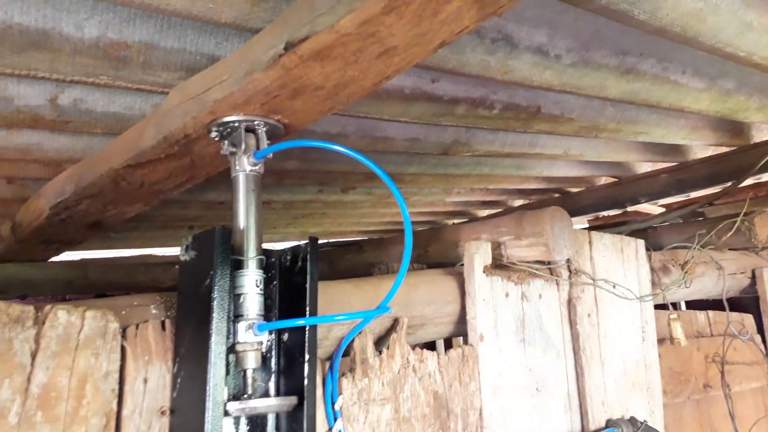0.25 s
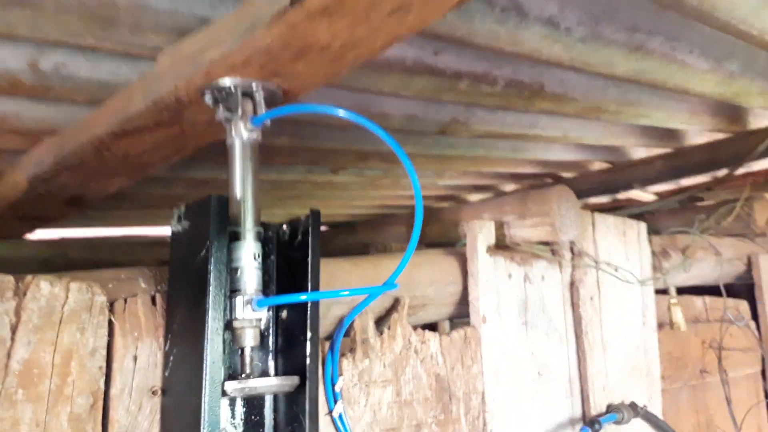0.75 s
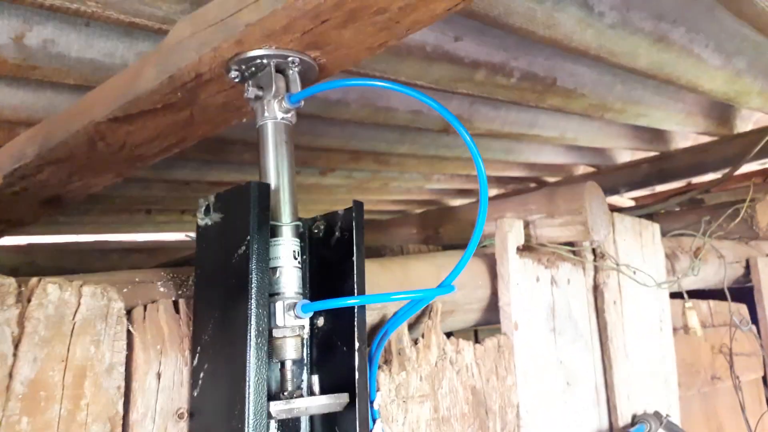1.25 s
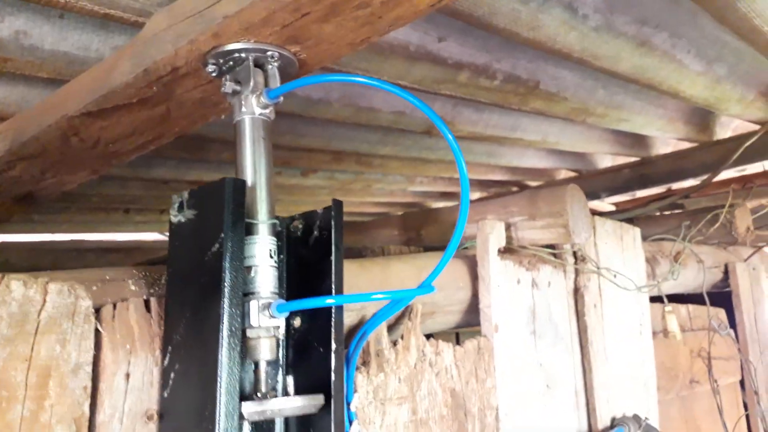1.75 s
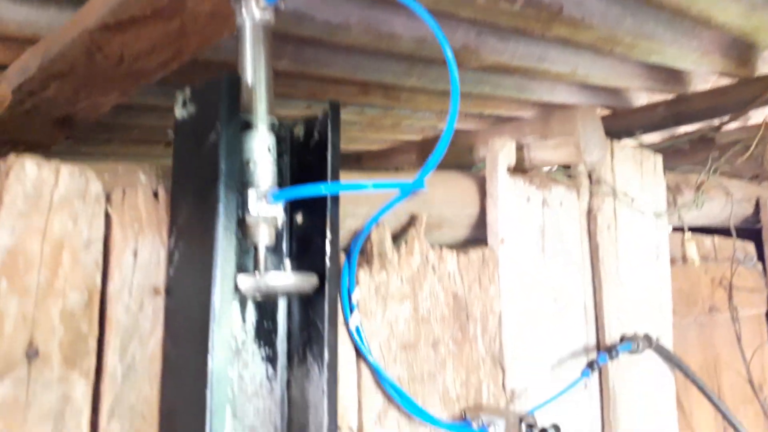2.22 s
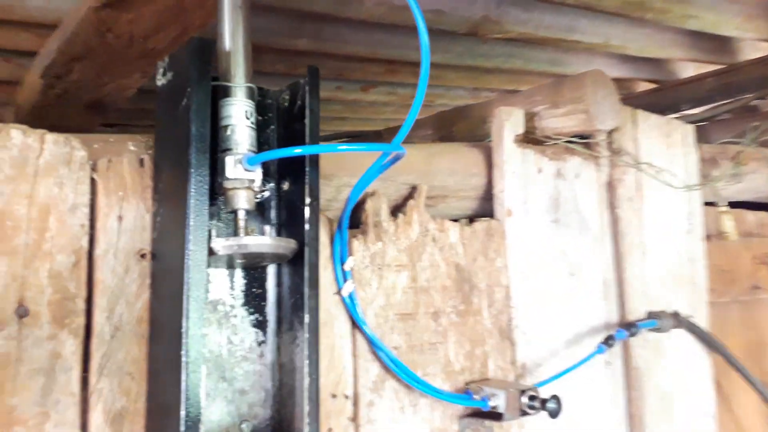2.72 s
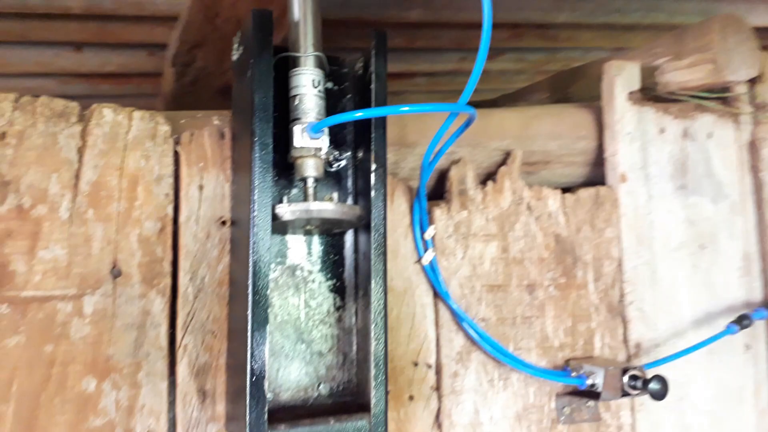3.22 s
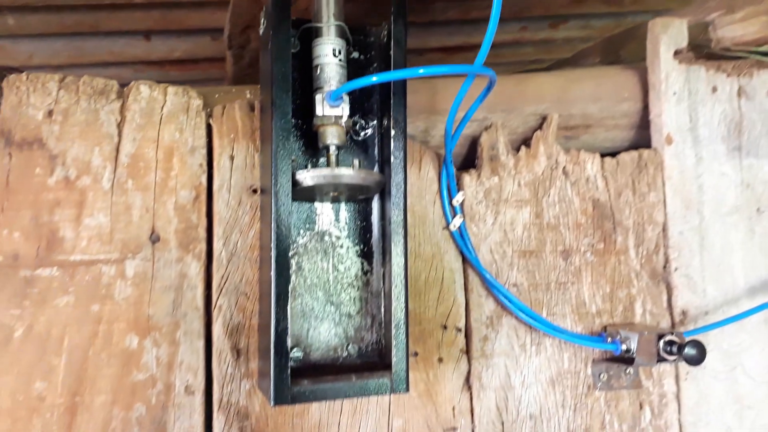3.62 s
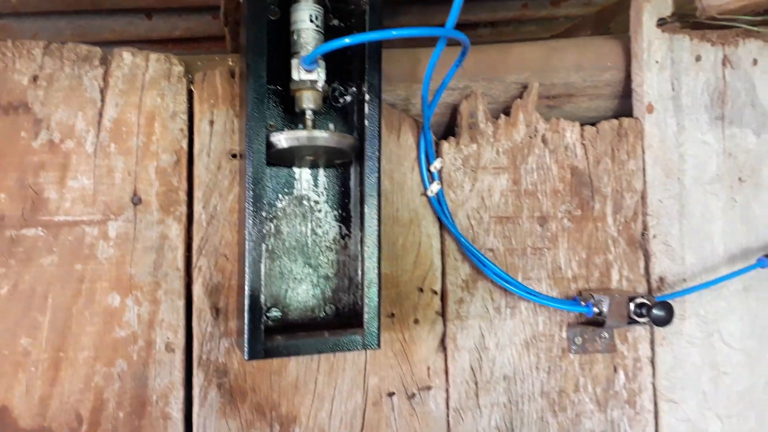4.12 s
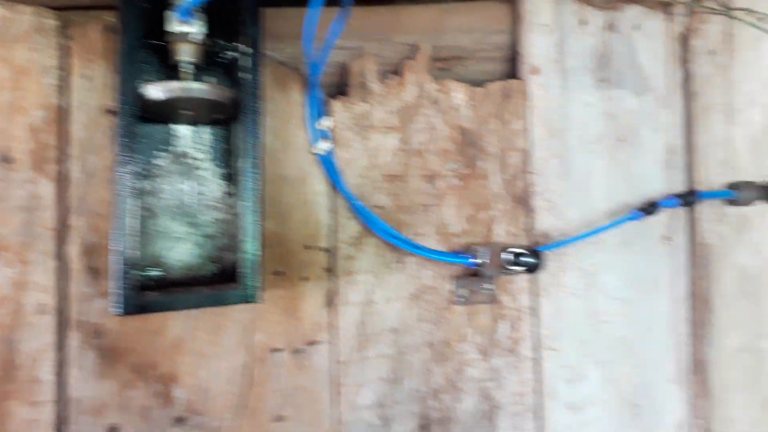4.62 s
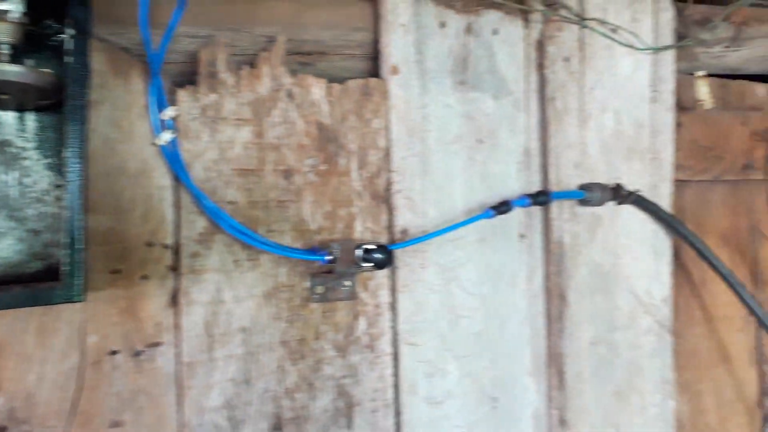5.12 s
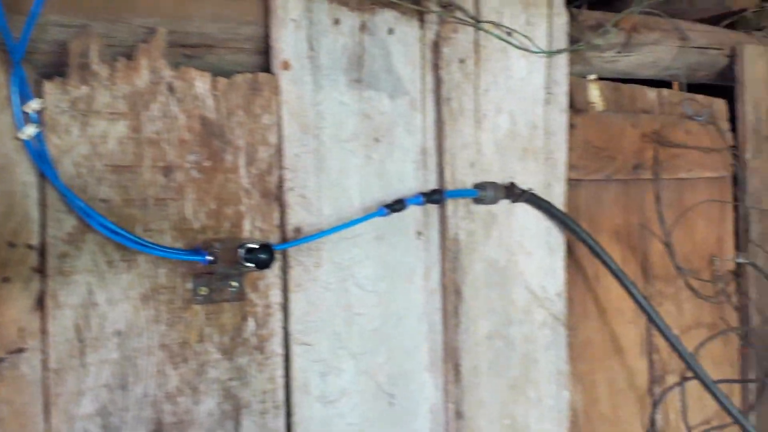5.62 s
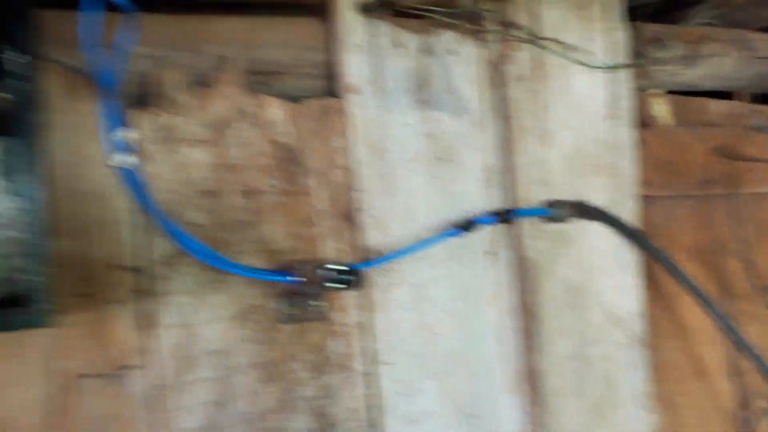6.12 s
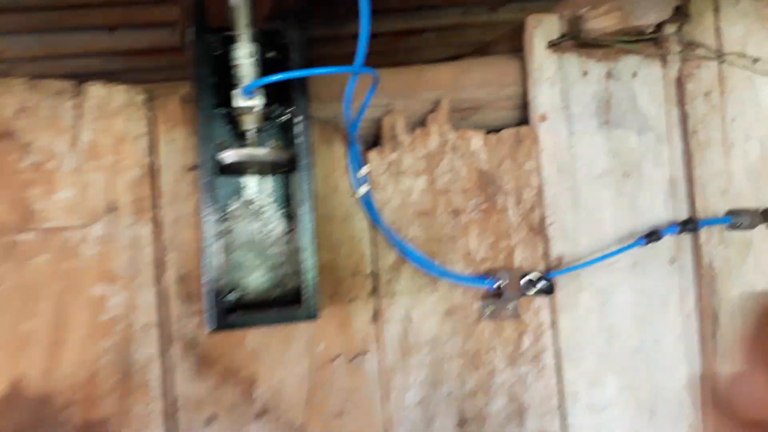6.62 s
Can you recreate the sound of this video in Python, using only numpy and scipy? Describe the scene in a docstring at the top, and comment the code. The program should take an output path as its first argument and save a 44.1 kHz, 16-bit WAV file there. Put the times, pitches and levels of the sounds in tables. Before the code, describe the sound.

A loud, bright jet of escaping air fills the first five seconds, whistling thinly at first and shifting in colour as the hand-held microphone drifts past. It shuts off instantly with a dull thud. Near silence follows: low motor hum, a slight leaking hiss, tiny knocks and rubs, a sharp burst of close clicks, and a faint pulsing cricket. Small, dry wooden shed, close perspective.

```python
"""In a wooden shed, air hisses from a valve close to a hand-held microphone that drifts past it.
The jet is shaped noise: it whistles in the fitting, and its bands slide with the angle.
The valve shuts with a thud, a struck resonance. In the quiet come a motor hum, a slight leak of noise,
a cricket made of a pulsing tone, faint knocks of ringing noise, and a flurry of close clicks."""
import sys
import numpy as np
from scipy import signal
from scipy.fft import rfft, irfft, next_fast_len
from scipy.io import wavfile
from scipy.ndimage import uniform_filter1d, map_coordinates

SR = 44100
rng = np.random.default_rng(int(sys.argv[2]) if len(sys.argv) > 2 else 0)


def generate_wav(sig):
    """Save sig (samples, or channels by samples) to the path in sys.argv[1] as 16-bit PCM at SR."""
    pcm = np.round(np.clip(np.atleast_2d(sig).T, -1, 1) * 32767).astype(np.int16)
    wavfile.write(sys.argv[1], SR, pcm)


def volts_from_db(level):
    """Convert decibel levels to linear amplitude ratios."""
    exponent = np.asarray(level, float) / 20
    return 10 ** exponent


N = 302422  # length in samples
SHUT_S = 5.174  # the valve is fully closed


def unit(x):
    """Scaled to rms 1."""
    return x / np.sqrt(np.mean(x ** 2) + 1e-20)


def along(points, hz):
    """Reads (frequency [Hz], value) points on a log frequency axis."""
    f, v = np.transpose(points)
    return np.interp(np.log(hz + 1), np.log(f + 1), v)


def curves(rows, t=None):
    """Each column after the time, read at times t (every sample by default)."""
    if t is None:
        t = np.arange(N) / SR
    s, *cols = np.transpose(rows)
    return [np.interp(t, s, c) for c in cols]


def wobble(rate):
    """A smooth random curve with rate knots a second."""
    knots = rng.standard_normal(int(N * rate / SR) + 4)
    return map_coordinates(knots, [np.arange(N) * rate / SR])


def swell(t, middle, length):
    """A smooth rise and fall, 1 at its middle."""
    return np.exp(-(2 * (t - middle) / length) ** 2)


def filtered(x, response):
    """x times a complex response of frequency."""
    m = next_fast_len(len(x) + 8192)
    return irfft(rfft(x, m) * response(np.fft.rfftfreq(m, 1 / SR)), m)[:len(x)]


def mode(f, hz, width_hz):
    """Response of one resonance, which rings only after it is driven."""
    return 1j * f * width_hz / (hz * hz - f * f + 1j * f * width_hz)


def noise(spectrum):
    """Coloured noise of rms 1."""
    return unit(filtered(rng.standard_normal(N), lambda f: volts_from_db(along(spectrum, f))))


def struck(blows, response):
    """Blows ring a body whose answer to a blow of size 1 peaks at 1."""
    return filtered(blows, response) / abs(filtered(signal.unit_impulse(4096), response)).max()


def recorder_hiss():
    """The recorder's own faint coloured noise."""
    return volts_from_db(-82) * noise([(20, -25), (120, 3), (400, 4), (1500, -6), (4500, 1), (15000, -5)])


def motor_hum():
    """A wavering note, which is noise through a narrow resonance, with a steadier overtone."""
    t = np.arange(N) / SR
    note = unit(filtered(rng.standard_normal(N), lambda f: mode(f, hz=118.4, width_hz=18)))
    overtone = unit(np.sin(2 * np.pi * 240 * t + 0.4 * wobble(5.5)))
    return volts_from_db(-63) * note + volts_from_db(-66 + 1.4 * wobble(12)) * overtone


# Colour of the rumble: (frequency [Hz], relative level [dB])
RUMBLE_COLOUR = [(15, -87.5), (25, -59), (91, -9.5), (123, -6), (149, -11.5), (210, -10.5), (248, -10),
                 (301, -13.5), (900, -46), (1170, -87), (1980, -120)]
# Loudness of the low sounds: (time [s], rumble level [dB], deepest bass level [dB])
BASS_LEVELS = [(0, -59, -70), (1.1, -52, -70), (1.5, -58.5, -76.5), (4, -59, -77), (5.7, -65, -83),
               (6.2, -66.5, -76.5)]


def rumble():
    """Two layers of low noise whose levels wander."""
    rumble_db, deep_db = curves(BASS_LEVELS)
    deep_colour = [(15, -38.5), (35, -8), (55, -4.5), (90, -9.5), (200, -52)]
    deep = volts_from_db(deep_db + 2.1 * wobble(7)) * noise(deep_colour)
    return volts_from_db(rumble_db + wobble(12)) * noise(RUMBLE_COLOUR) + deep


# Colour of the leak: (frequency [Hz], relative level [dB])
LEAK_COLOUR = [(530, -52.5), (900, -24), (1900, -27), (3100, -28), (3600, -19), (4700, -13), (6100, -14),
               (6650, -6), (7400, -15.5), (10000, -28), (13000, -28), (15500, -35)]


def leak():
    """Air seeping out as hiss: after the valve shuts, it settles to a lower level."""
    LEAK_DB, EXTRA_DB, SETTLE_S = -65, 7, .12
    since_shut = np.clip(np.arange(N) / SR - SHUT_S, 0, None)
    level_db = LEAK_DB + EXTRA_DB * np.exp(-since_shut / SETTLE_S)
    return volts_from_db(level_db + 1.3 * wobble(10)) * noise(LEAK_COLOUR)


# Colour of the rustling: (frequency [Hz], relative level [dB])
RUSTLE_COLOUR = [(600, -33), (1500, -3), (3000, -8), (4000, -1), (9000, -6.5), (10500, -13), (14000, -13),
                 (15500, -17.5)]
# Strokes of cloth and hand: (middle [s], length [s], level [dB])
RUSTLE_STROKES = [(5.246, 0.092, -60), (5.347, 0.084, -61.5), (5.551, 0.041, -67.5), (5.666, 0.053, -65),
                  (6.36, 0.065, -53.5), (6.412, .04, -54)]


def rustles():
    """Cloth and hand rub in short swells of grainy noise over a faint floor."""
    t = np.arange(N) / SR
    floor = volts_from_db(-84)
    strokes = floor + sum(volts_from_db(db) * swell(t, s, length) for s, length, db in RUSTLE_STROKES)
    return strokes * volts_from_db(2.4 * wobble(150)) * noise(RUSTLE_COLOUR)


def cricket():
    """A narrow far song in pulses that sets in and grows."""
    SONG_HZ, PULSES_PER_S = 5430, 16
    START_S, START_DB, RISE_S, GROWS_DB_PER_S = 5.85, -71, .25, 6
    t = np.arange(N) / SR
    song = np.sin(2 * np.pi * SONG_HZ * t + .5 * wobble(40)) * volts_from_db(2 * wobble(20))
    pulses = np.clip(.6 + .7 * np.sin(2 * np.pi * PULSES_PER_S * (t - 6.703)), 0, 1)
    since = t - START_S
    fade_in = np.clip(since / RISE_S, 0, 1)
    return volts_from_db(START_DB + GROWS_DB_PER_S * since) * fade_in * song * pulses


# Faint ringing knocks:
# (time [s], level before the fades [dB], frequency [Hz], width [Hz], time to die by 60 dB [s])
KNOCK_LIST = [(5.543, -51, 1180, 80, .16), (5.2, -66, 1770, 70, 1.2), (5.245, -62, 1770, 60, .1),
              (5.25, -64, 500, 150, .08), (5.34, -62, 480, 200, .12), (5.55, -68, 1800, 500, .2),
              (5.655, -68, 1850, 300, .12), (5.765, -58, 1200, 4000, .015), (6.152, -62, 1450, 450, .3),
              (6.152, -64, 2400, 900, .22), (6.19, -68, 8000, 900, .08), (6.22, -68, 4200, 900, .05)]


def knocks():
    """Each is a burst of noise in one resonance, dying away."""
    out, t = np.zeros(N + SR), np.arange(SR // 2) / SR
    for s, db, hz, width_hz, t60 in KNOCK_LIST:
        ring = unit(filtered(rng.standard_normal(len(t)), lambda f: mode(f, hz, width_hz) ** 2))
        onset = 1 - np.exp(-t * width_hz / .5)  # narrow resonances build up more slowly
        out[round(s * SR):][:len(t)] += volts_from_db(db - 60 * t / t60) * onset * ring
    return out[:N]


# Close clicks: (time [s], snap drive [dB], hollow peak [dB], shell peak [dB])
CLICK_LIST = [(6.3274, -23, -55, -44), (6.3332, -19, -53, -40), (6.3391, -14, -46, -34),
              (6.3533, -36, -20, -32), (6.3505, -26, -55, -50), (6.3615, -30, -33, -44),
              (6.3725, -40, -38, -55), (6.3904, -20, -44, -35), (6.3962, -26, -55, -44),
              (6.3976, -6, -22, -16)]
# Resonances that colour the snap: (frequency [Hz], width [Hz], level [dB])
SNAP_MODES = [(2180, 740, 1), (4110, 920, 3), (6850, 2000, -5), (14400, 3100, -9)]


def clicks():
    """A sharp snap, with a low hollow ring and a higher shell ring starting together."""
    snaps, pushes, taps, t = np.zeros(N), np.zeros(N), np.zeros(N), np.arange(SR // 20) / SR
    splinters, scratchy_trail = volts_from_db(-12 - 60 * t / 0.0013), volts_from_db(-20.5 - 60 * t / .03)
    for s, snap_db, hollow_db, shell_db in CLICK_LIST:
        start = round(s * SR)
        crack = (splinters + scratchy_trail) * rng.standard_normal(len(t))
        snaps[start:][:len(t)] += volts_from_db(snap_db) * crack
        snaps[start] -= volts_from_db(snap_db + 7)
        pushes[start] = volts_from_db(hollow_db)
        taps[start] = -volts_from_db(shell_db)

    def snap_response(f):
        """The resonances side by side, with alternating sign."""
        return sum((-1) ** k * volts_from_db(db) * mode(f, hz, w) for k, (hz, w, db) in enumerate(SNAP_MODES))

    bright = filtered(snaps, snap_response)
    hollow = struck(pushes, lambda f: mode(f, hz=465, width_hz=170) * mode(f, hz=550, width_hz=700))
    shell = struck(taps, lambda f: mode(f, hz=1150, width_hz=1000) ** 2)
    return bright + hollow + shell


# How fast the shed's echo dies: (frequency [Hz], time to die by 60 dB [s])
SHED_DECAY = [(300, .1), (3000, .1), (12000, .085)]


def shed(x, count):
    """Each pitch of the walls' answer dies at its own speed; the sound moves through count answers."""
    out, place = np.zeros(N), np.arange(N) / N * (count - 1)
    for k in range(count):
        hz, t, z = signal.stft(rng.standard_normal(SR // 4), SR, nperseg=256)
        decay = volts_from_db(-60 * t / along(SHED_DECAY, hz)[:, None])
        tail = signal.istft(z * decay, SR, nperseg=256)[1]
        here = np.sqrt(np.clip(1 - abs(place - k), 0, 1))
        delayed = np.pad(x * here, (130, 0))  # the walls answer 130 samples late
        out += signal.fftconvolve(delayed, tail / np.linalg.norm(tail))[:N]
    return out


def thud():
    """The valve seats with one dull blow that rings a broad resonance."""
    blow = volts_from_db(-24) * signal.unit_impulse(N, round(5.1705 * SR))
    return struck(blow, lambda f: mode(f, hz=720, width_hz=800) ** 2)


# Strength of the jet before its bands are shaped: (time [s], hiss level [dB], roar over hiss [dB])
JET_LEVELS = [(0, -14.5, -20), (.43, -14.5, -19.5), (.76, -15.5, -17), (1.05, -14.5, -18),
              (1.65, -14.5, -19), (2.62, -15.5, -21.5), (3.3, -16, -20), (4.43, -17, -21),
              (5.17, -21, -19.5)]
# Colour of the hiss: (frequency [Hz], relative level [dB])
HISS_COLOUR = [(1470, -49), (2500, -16.5), (3530, -5), (4220, -3.5), (4620, -2.5), (5730, -1), (6150, -1.5),
               (9030, -2), (10400, -7.5), (12200, -4), (15700, -9)]
# Colour of the low roar: (frequency [Hz], relative level [dB])
ROAR_COLOUR = [(160, -55.5), (280, -20), (438, -14), (842, -9), (1090, -5), (1270, -10), (1880, -3.5),
               (2640, -4.5), (3200, -1), (4160, -33), (7040, -120)]


def jet_flow():
    """Turbulent air: a hiss with a low roar, both unsteady."""
    hiss_db, roar_db = curves(JET_LEVELS)
    roar = volts_from_db(roar_db + 0.2 * wobble(9)) * noise(ROAR_COLOUR)
    return volts_from_db(hiss_db + 0.24 * wobble(12)) * (noise(HISS_COLOUR) + roar)


def bump(f, hz, width_hz):
    """A rounded peak over frequency, 1 at its centre."""
    return 1 / (1 + (2 * (f - hz) / width_hz) ** 2)


# Resonances of the air column in the hose: (frequency [Hz], width [Hz], lift [dB])
HOSE_MODES = [(1836, 76, 6.5), (2370, 80, 3.5), (3510, 110, 0.5)]
# Strength of the whistle in the fitting: (time [s], lift [dB])
WHISTLE_LIFT = [(0, 11.5), (2.05, 9.5), (2.25, -1), (3, 1), (4.2, 5.5), (5.17, 5)]


def whistle_db(f, t):
    """The air column and the fitting lift or lower narrow bands of the jet."""
    hose = sum(db * bump(f, hz, width_hz) for hz, width_hz, db in HOSE_MODES)
    return hose + curves(WHISTLE_LIFT, t)[0] * bump(f, hz=5230, width_hz=90)


# How the microphone turns: (time [s], turn [0 = beside the valve, 1 = facing it])
MICROPHONE_TURN = [(0, 0), (.45, 0), (.65, 0), (1.05, 0.14), (1.4, 0.035), (1.95, 0.14), (2.3, 0.49),
                   (3.1, 0.39), (3.75, 0.95), (5.17, 0.9)]
# Bands that shift with the turn:
# (beside [Hz], facing [Hz], width [Hz], lift beside [dB], lift facing [dB])
ANGLE_BANDS = [(429.5, 370, 300, -7, 0), (790, 530, 280, 1.6, 0.8), (1162, 1090, 78, 5.5, 8),
               (3080, 2500, 230, 0, -3.5), (4690, 4590, 380, 2.5, 4), (5860, 6000, 460, 3, 3),
               (6500, 6400, 250, -3.5, 2.5), (7170, 6900, 400, 2.5, 0.3), (8600, 7950, 430, 2, 2),
               (9730, 8900, 280, 0.5, 2), (10560, 9300, 950, -6.5, 2.5), (12150, 12300, 1300, -1, 8.5),
               (13200, 13250, 500, -6.5, 1), (14600, 14500, 1500, 0.1, 5)]


def angle_db(f, t):
    """Bands of the jet slide and change strength as the microphone turns."""
    turn, = curves(MICROPHONE_TURN, t)
    lift_db = 0
    for hz0, hz1, width_hz, db0, db1 in ANGLE_BANDS:
        centre_hz = hz0 + turn * (hz1 - hz0)
        lift_db = lift_db + (db0 + turn * (db1 - db0)) * bump(f, centre_hz, width_hz)
    return lift_db


# Passing bands of the jet: (middle [s], length [s], frequency [Hz], slide [Hz per s], lift [dB])
PASSING_BANDS = [(.45, 0.71, 10720, -600, -3.5), (0.648, .35, 12740, 28.5, 5),
                 (0.724, .4, 7300, 29.5, -7.5), (0.981, 0.59, 9110, -900, 10.5),
                 (1.004, .6, 3190, -500, -12), (0.994, .4, 10170, 28.5, 4), (1.701, 1.1, 8290, -300, 7),
                 (2.402, .9, 10600, -300, -4.5), (2.598, 0.89, 9390, -450, 5.5),
                 (2.601, 0.79, 13470, -300, -5.5), (3.1, 1.5, 6400, -650, -6), (3.35, 1, 7040, -100, 6.5),
                 (3.25, 0.74, 4570, 30.5, 5), (4.5, 1.3, 5650, -100, -7), (1.5, 1.1, 6500, 30, -4),
                 (1.6, 1.1, 10100, 100, -4), (1.05, .5, 13500, 30, 4), (.3, .9, 950, 30, -4),
                 (4.6, 1.4, 10100, 30, 4), (.35, 1.1, 14300, 30, -3), (1.6, 1.3, 7300, -300, 3),
                 (2.6, .7, 7900, 30, 3), (2.5, 1.1, 14500, 100, -4), (4.6, 1.3, 3100, 30, 4),
                 (1.4, .9, 1890, 30, 4), (1.4, .9, 4400, -300, 3), (.5, .9, 3350, -100, -4),
                 (2.1, .9, 9100, 30, 3), (4.95, .6, 11400, 602, -4)]


def passing_db(f, t):
    """Stretches of the jet's spectrum briefly swell or dip while sliding in pitch."""
    lift_db = 0
    for s, length, hz, slide, db in PASSING_BANDS:
        width_hz = hz / 20.3
        lift_db = lift_db + db * swell(t, s, length) * bump(f, hz + slide * (t - s), width_hz)
    return lift_db


def ripple_db(shape, bins, frames):
    """Random ripples, smoothed over frequency bins and time frames, of rms 1 dB."""
    smooth = uniform_filter1d(rng.standard_normal(shape), bins, 0)
    return unit(uniform_filter1d(smooth, frames, 1))


def jet():
    """The flow is shaped by whistle, angle, passing bands and ripples until the valve closes."""
    f, t, z = signal.stft(jet_flow(), SR, nperseg=1024)
    f = f[:, None]
    lift_db = whistle_db(f, t) + angle_db(f, t) + passing_db(f, t)
    lift_db = lift_db + 0.83 * ripple_db(z.shape, bins=3, frames=50)  # slow drift
    lift_db = lift_db + 0.51 * ripple_db(z.shape, bins=10, frames=6)  # quicker flicker
    air = signal.istft(z * volts_from_db(lift_db - 2), SR, nperseg=1024)[1][:N]
    valve_open = np.clip((SHUT_S - np.arange(N) / SR) / 0.0022, 0, 1)  # closes within 2.2 ms
    return air * valve_open


def scene():
    """One microphone feeds both channels; the recorder's own hiss has opposite sign in them."""
    air, near = jet(), clicks()
    walls = shed(volts_from_db(-8.5) * air + volts_from_db(-28) * near, count=9)
    room_tone = motor_hum() + rumble() + leak() + rustles()
    mono = air + near + walls + thud() + knocks() + room_tone + cricket()
    side = recorder_hiss()
    return np.array([mono + side, mono - side])


def band_limit(x):
    """A steep low-pass at the top of the band."""
    return signal.sosfilt(signal.butter(12, 17060, fs=SR, output="sos"), x)


def record(dry):
    """The highest treble is cut off by a smooth edge from 15680 to 15800 Hz."""
    def edge(f):
        """1 below the edge, 0 above it."""
        return np.cos(np.pi / 2 * np.clip((f - 15680) / 120, 0, 1)) ** 2

    mix = np.array([filtered(channel, edge) for channel in dry])
    return band_limit(mix)


dry = scene()
out = record(dry)
generate_wav(out)
```